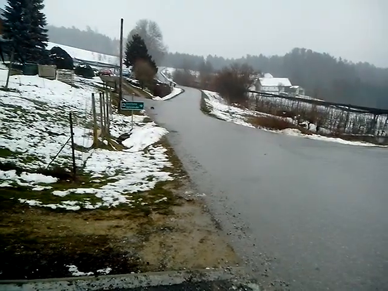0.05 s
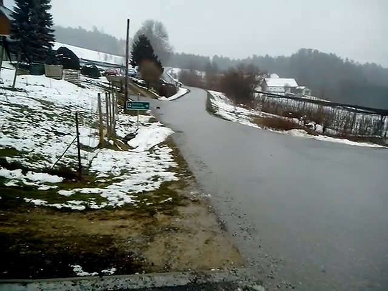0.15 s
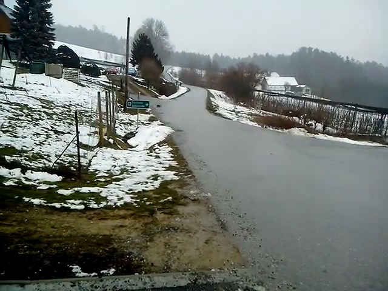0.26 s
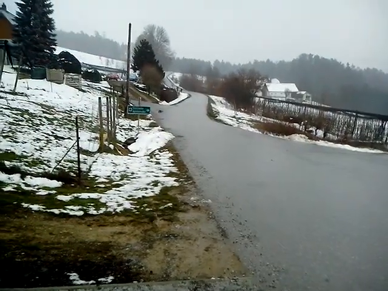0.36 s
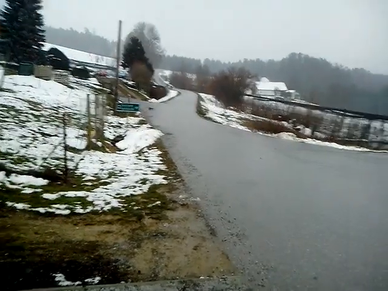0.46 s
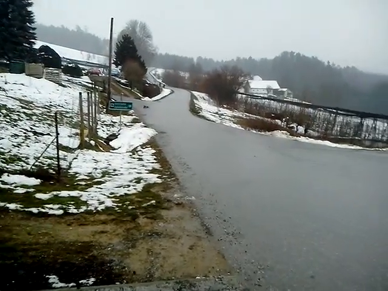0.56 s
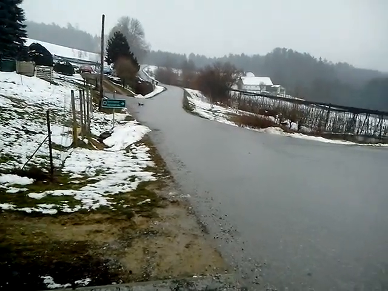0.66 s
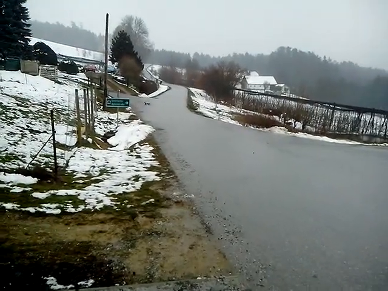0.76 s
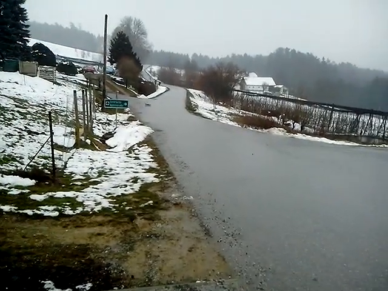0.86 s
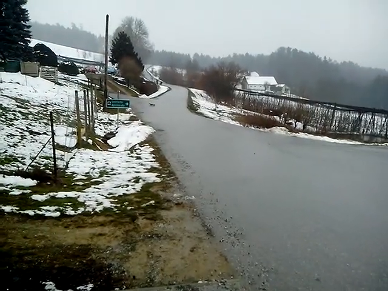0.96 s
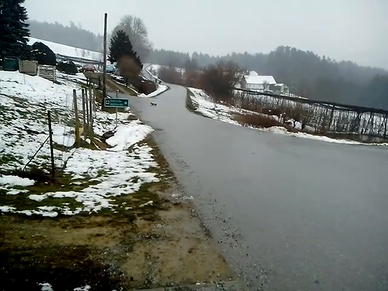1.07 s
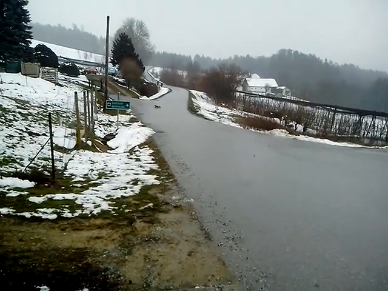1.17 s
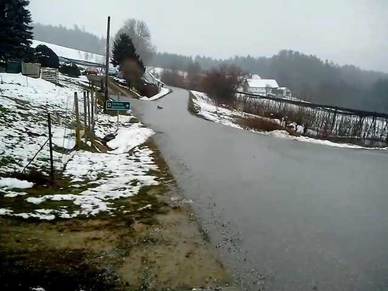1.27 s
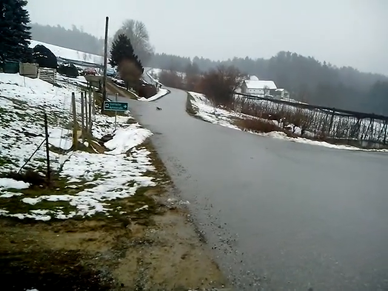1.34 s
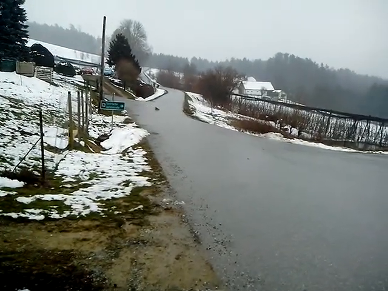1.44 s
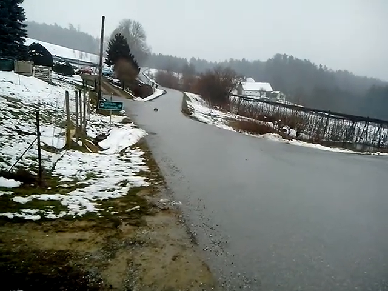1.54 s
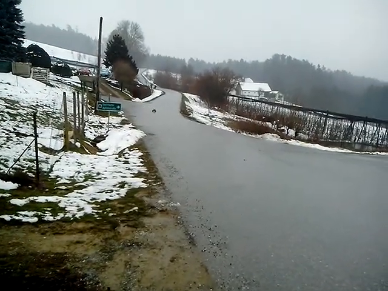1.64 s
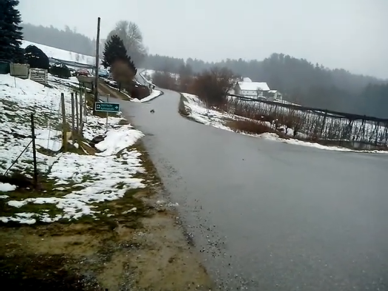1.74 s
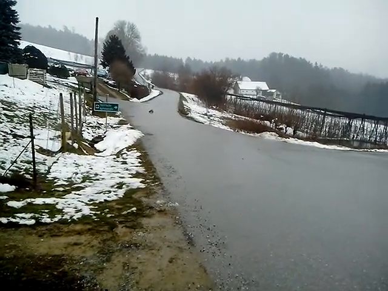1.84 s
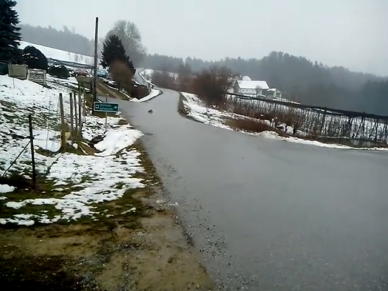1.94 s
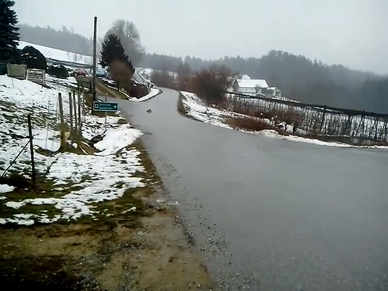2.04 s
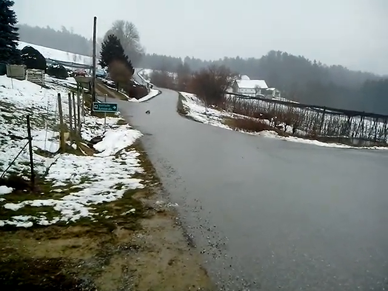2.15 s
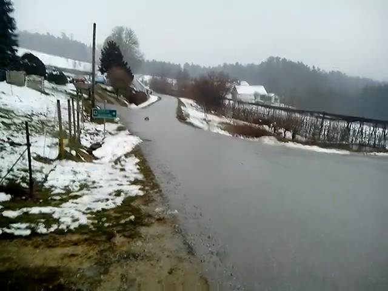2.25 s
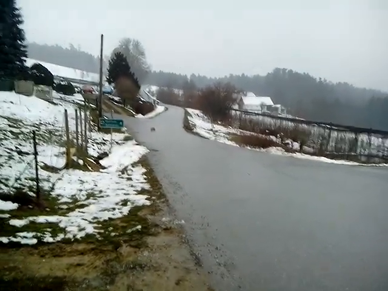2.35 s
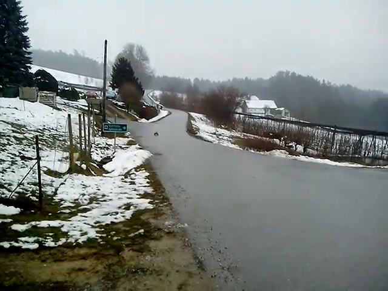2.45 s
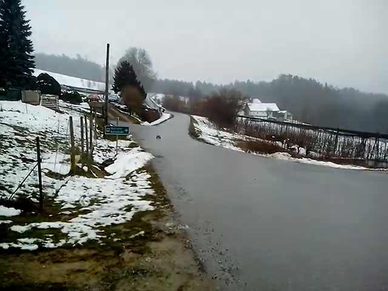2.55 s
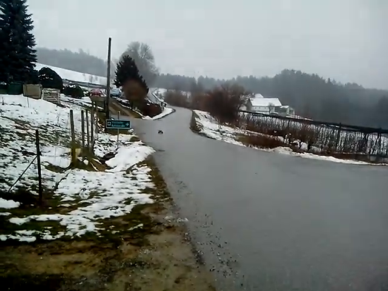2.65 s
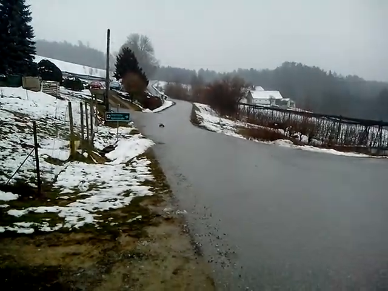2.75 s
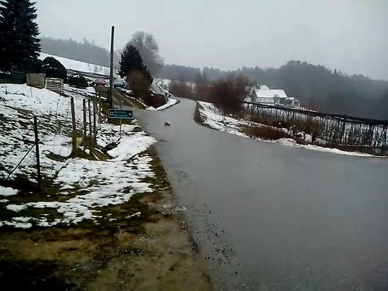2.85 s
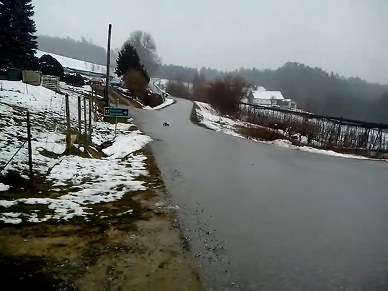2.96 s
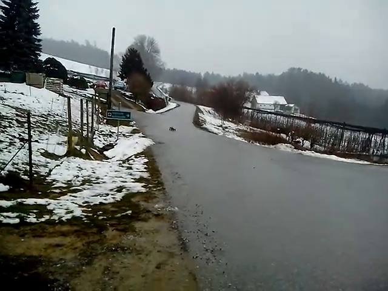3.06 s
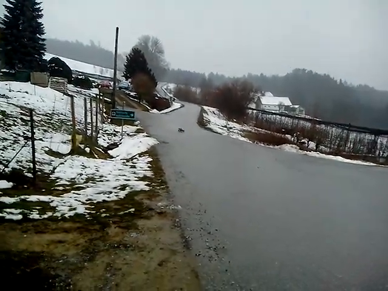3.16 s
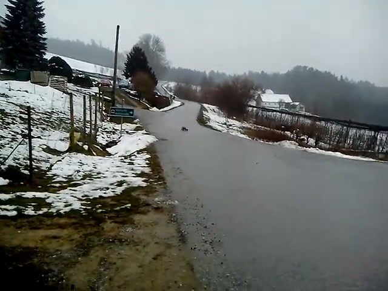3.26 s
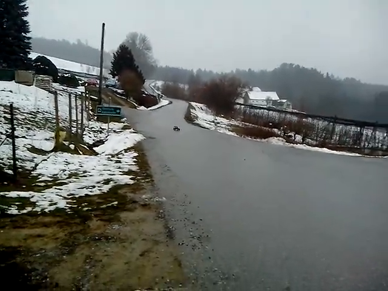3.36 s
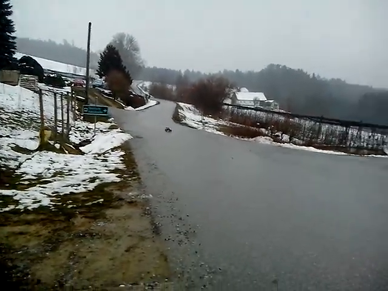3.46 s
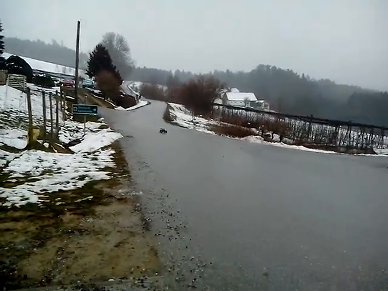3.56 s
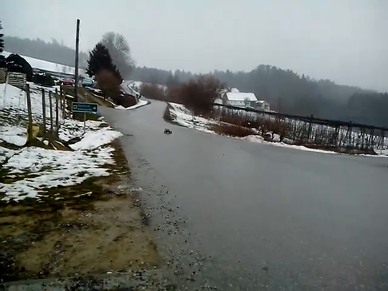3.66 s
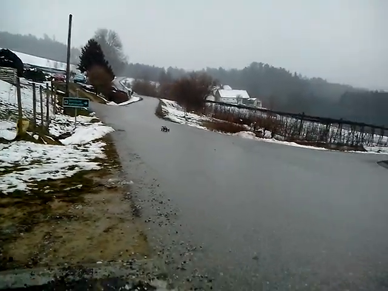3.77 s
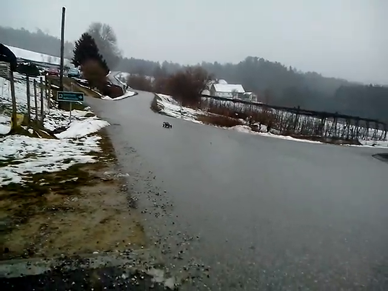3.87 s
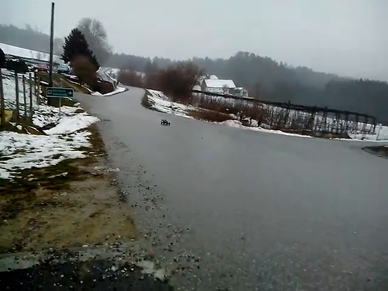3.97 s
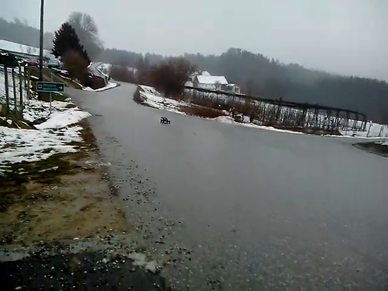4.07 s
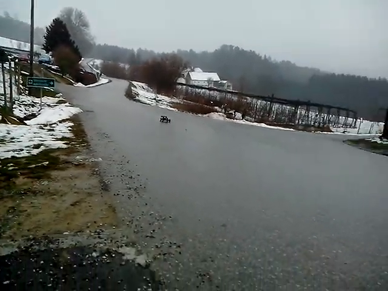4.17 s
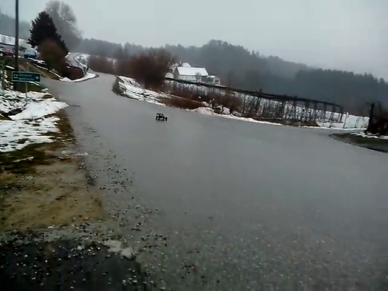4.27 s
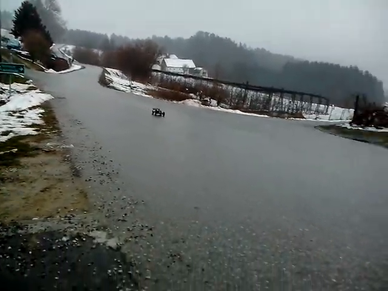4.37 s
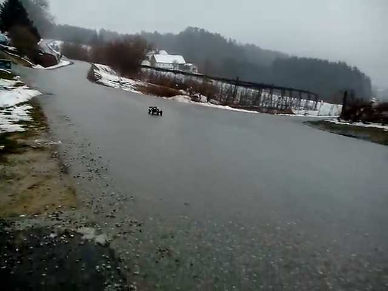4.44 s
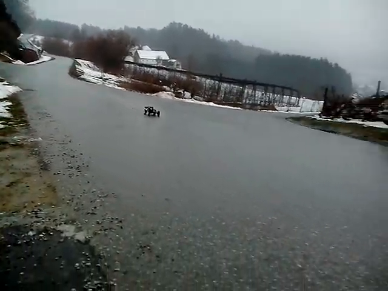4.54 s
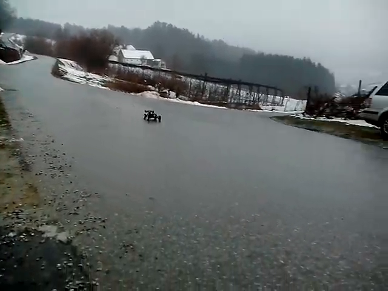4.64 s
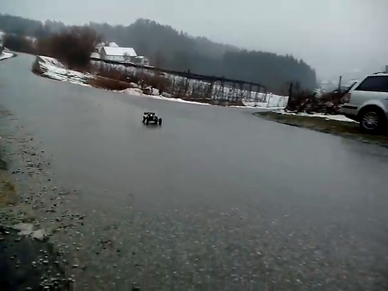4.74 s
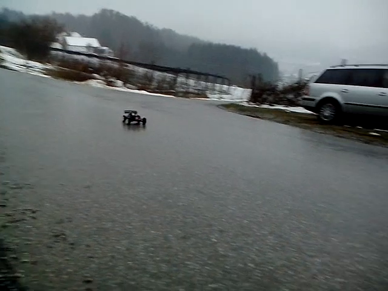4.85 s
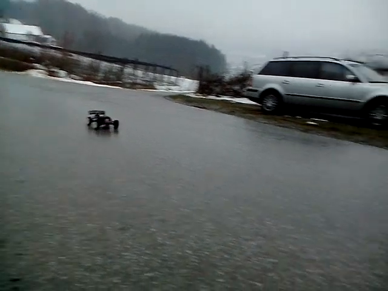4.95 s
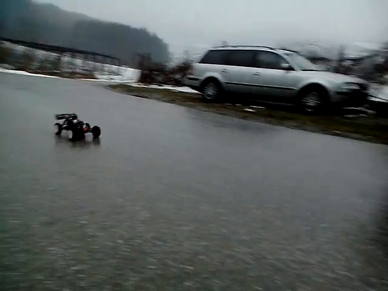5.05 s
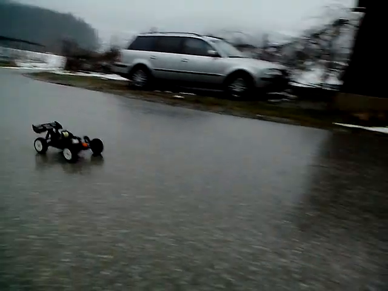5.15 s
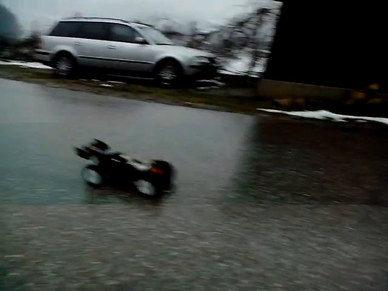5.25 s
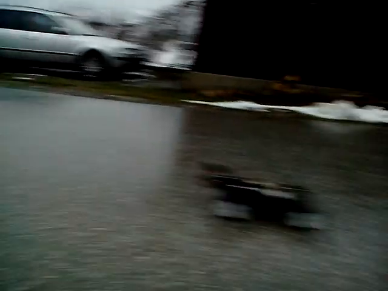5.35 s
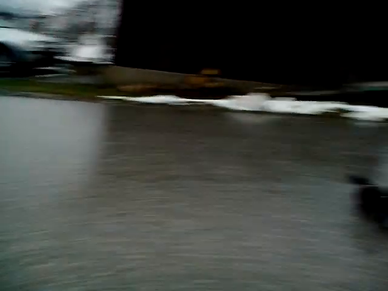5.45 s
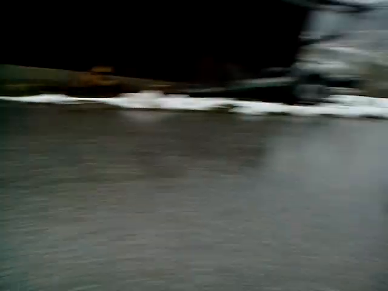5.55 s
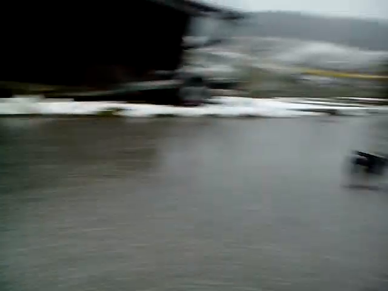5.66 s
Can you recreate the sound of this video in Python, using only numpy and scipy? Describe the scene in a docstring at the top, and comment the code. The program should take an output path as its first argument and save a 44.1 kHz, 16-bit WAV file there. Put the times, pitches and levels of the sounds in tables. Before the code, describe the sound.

Outdoors on a wet country road, a small fuel-powered model buggy buzzes faintly far off, falls to a rattling idle, then opens up. Its raspy whine climbs unevenly in pitch and loudness, stuttering, until it screams past the microphone with wet tyre hiss and quickly drops away. Thin, slightly harsh small-microphone sound.

```python
"""A nitro model buggy, far down a wet country road, drops to idle, then opens up and races past.
Its tiny two-stroke fires once a turn: near-pure low exhaust orders, and trains of pulses and gas noise
that excite the resonances of a rasping pipe and silencer, a hoarse intake and a shrill metal casing.
Wet tyres hiss as filtered noise, strongest close by; delayed copies give faint roadside echoes.
Behind lie a soft hiss, a faint 100 Hz tone that lossy coding cuts in and out, and one dull bump."""
import sys
import numpy as np
from scipy import signal
from scipy.fft import rfft, irfft, next_fast_len
from scipy.io import wavfile
from scipy.ndimage import uniform_filter1d, map_coordinates

SR = 44100
rng = np.random.default_rng(int(sys.argv[2]) if len(sys.argv) > 2 else 0)


def wav_record(signal):
    """Record a signal, one row per channel, as 16-bit PCM in the file named by sys.argv[1]."""
    frames = np.transpose(np.atleast_2d(signal))
    bounded = np.clip(frames, -1, 1)
    # unit amplitude maps onto the largest positive 16-bit level
    quanta = np.round(bounded * 32767).astype(np.int16)
    wavfile.write(sys.argv[1], SR, quanta)


N = 251811
TIME = np.arange(N) / SR
# nearest moment (s), nearest distance (m), road speed (m/s)
PASS_S, PASS_M, ROAD_M_PER_S = 5.54, 2.27, 5.1
# the rocking buggy: spread of its level and of each resonance (dB), random steps per s
ROCK_DB, MODE_FADE_DB, ROCKS_PER_S = 1.0, 5.5, 8.0


def from_db(db):
    """Logarithmic level: decibels become an amplitude gain."""
    return 10 ** (np.asarray(db) / 20)


def in_time(rows):
    """Linear interpolation: one curve over time for each column after the time."""
    seconds, *columns = np.transpose(rows)
    return [np.interp(TIME, seconds, column) for column in columns]


def track(rows):
    """Linear interpolation of a table with a single column after the time."""
    return in_time(rows)[0]


def levelled(x, size=3001):
    """Normalisation: divide by the running rms so that the level stays near 1."""
    return x / np.sqrt(np.abs(uniform_filter1d(x * x, size)) + 1e-12)


def band(x, low_hz, high_hz, order=2):
    """Band limitation: a Butterworth filter passes only the stated range."""
    return signal.sosfilt(signal.butter(order, [low_hz, high_hz], "band", fs=SR, output="sos"), x)


def drift(rate):
    """Random modulation: a smooth curve through normal chance values, rate of them per second."""
    knots = rng.standard_normal(8000)
    return map_coordinates(knots, [TIME * rate], order=2, mode="wrap")


def noise(spectrum):
    """Spectral shaping: white noise weighted by frequency, then scaled to rms 1."""
    hz, db = np.transpose(spectrum)
    size = next_fast_len(N, True)
    log_hz = np.log(np.fft.rfftfreq(size, 1 / SR) + 1)
    gain = from_db(np.interp(log_hz, np.log(hz), db))
    x = irfft(rfft(rng.standard_normal(size)) * gain, size)[:N]
    return x / x.std()


def resonate(x, hz, width):
    """Resonance of about unit gain: shift to zero frequency, low-pass, shift back; the centre may move."""
    carrier = np.exp(2j * np.pi * np.cumsum(hz + np.zeros(N)) / SR)
    r = np.exp(-np.pi * width / SR)
    return 2 * np.real(carrier * signal.lfilter([1 - r], [1, -r], x / carrier))


def body(x, modes):
    """Modal superposition: resonances of alternating sign, each fading as the buggy turns and bounces."""
    total = np.zeros(N)
    for k, (hz, width, db) in enumerate(modes):
        gain = from_db(db + MODE_FADE_DB * drift(ROCKS_PER_S))
        total += (-1) ** k * gain * resonate(x, hz, width)
    return total


# Crank speed at part throttle, idle, a cruise, a stumbling climb, then flat out.
# Each row: time in seconds, speed in firings per second before hunting and stumbles.
CRANK_SPEED = [(0, 219), (.11, 224), (.15, 215), (.25, 222), (.41, 216), (.62, 120), (.8, 118), (.89, 205),
               (1.04, 208), (1.16, 247), (1.35, 238), (1.41, 250), (1.49, 238), (1.7, 238), (2.2, 247),
               (2.52, 249), (2.636, 262), (2.664, 278), (2.695, 305), (2.725, 305), (2.745, 295),
               (2.772, 298), (2.8, 277), (2.824, 277), (2.864, 298), (2.89, 293), (2.92, 298), (2.968, 293),
               (2.99, 285), (3.022, 296), (3.076, 300), (3.148, 297), (3.168, 315), (3.195, 306),
               (3.262, 317), (3.316, 311), (3.34, 315), (3.408, 308), (3.508, 330.5), (3.6, 338),
               (3.65, 345), (3.9, 361), (4.11, 375), (4.29, 385), (4.38, 383), (4.46, 395), (4.65, 399.5),
               (4.76, 399), (4.86, 412.5), (5.47, 423.5), (5.71, 410)]
# Main pipe resonance, which rises as the exhaust gas heats under load.
# Each row: time in seconds, frequency in Hz.
PIPE_TUNING = [(0, 1305), (.3, 1340), (.7, 1430), (1.03, 1408), (1.2, 1520), (1.4, 1660), (1.62, 1347),
               (2.2, 1564), (2.6, 1560), (3.0, 1530), (3.4, 1750), (3.6, 1670), (4.398, 1714), (4.9, 1810)]
# Pipe modes. Each row: multiple of the main resonance, width in Hz, relative level in dB.
PIPE_MODES = [(0.779, 201, -4), (1, 194, 5), (1.18, 216, 0)]
# Lower silencer modes. Each row: frequency in Hz, width in Hz, relative level in dB.
RASP_MODES = [(2306, 180, 1), (2608, 130, -4.5), (2888, 110, -3)]
# Upper silencer modes. Each row: frequency in Hz, width in Hz, relative level in dB.
HIGH_RASP_MODES = [(3144, 72, 3), (3428, 55, 1.5), (3596, 110, -8)]
# Main intake resonance. Each row: time in seconds, frequency in Hz.
INTAKE_TUNING = [(0, 4490), (.9, 4930), (1.02, 4650), (1.131, 4680), (1.45, 4620), (1.88, 4820),
                 (2.1, 4900), (2.929, 4870), (3.459, 4460), (4.07, 4670), (4.35, 5340), (5.1, 5120),
                 (5.5, 5270)]
# Intake modes. Each row: multiple of the main resonance, width in Hz, relative level in dB.
INTAKE_MODES = [(.92, 129.4, -1.5), (1.001, 130.5, -1.5), (1.059, 130, -1.5)]
# Casing modes. Each row: multiple of the casing ring, width in Hz, relative level in dB.
CASING_MODES = [(0.953, 130, 0), (0.999, 121.6, 3.5), (1.052, 130, -2.5)]
# Level of the pipe's bark in the midrange. Each row: time in seconds, level in dB before BARK_DB.
BARK_LEVEL = [(0.03, -38.5), (0.3, -47), (0.5, -64), (0.65, -69), (0.82, -52), (0.86, -39), (1.04, -36),
              (1.22, -33.5), (1.42, -36.5), (1.55, -44), (1.63, -35.5), (2.24, -33), (3.62, -37),
              (3.97, -30), (4.87, -36), (5.17, -30), (5.44, -34.5), (5.5, -29), (5.55, -45), (5.63, -51),
              (5.71, -59)]
# Level of the silencer's lower rasp. Each row: time in seconds, level in dB before RASP_DB.
RASP_LEVEL = [(0, -44), (.24, -44.5), (.45, -50.5), (.55, -79), (.8, -74), (.9, -48), (1.02, -46.5),
              (1.33, -38.5), (1.46, -54), (1.61, -42), (1.76, -63), (1.94, -37), (2.43, -42), (2.72, -39),
              (3.32, -40.5), (3.53, -37), (3.85, -37), (4.01, -30), (4.23, -40), (4.61, -32), (4.91, -40.5),
              (5.35, -27.5), (5.48, -31), (5.59, -33), (5.63, -48), (5.71, -47)]
# Level of the silencer's upper rasp. Each row: time in seconds, level in dB.
HIGH_RASP_LEVEL = [(0, -42), (.4, -51.5), (.55, -66), (.8, -61), (.9, -42), (1.02, -54), (1.14, -32),
                   (1.19, -39), (1.48, -31.5), (1.53, -43), (1.65, -34), (1.8, -44), (2.22, -38),
                   (2.67, -48.5), (3.02, -30.5), (3.08, -37), (3.65, -43.5), (4.04, -33), (4.34, -53),
                   (4.44, -38.5), (4.8, -42.5), (5.34, -29), (5.41, -34), (5.6, -27.5), (5.64, -46),
                   (5.71, -42)]
# Level of the intake rasp. Each row: time in seconds, level in dB.
INTAKE_RASP_LEVEL = [(0, -39.5), (.35, -51), (.55, -72), (.8, -66), (.87, -46), (.98, -50), (1.02, -37.5),
                     (1.08, -33.5), (1.13, -27.5), (1.18, -33), (1.25, -29), (1.42, -32.5), (1.77, -44),
                     (1.88, -32.5), (2.63, -46), (2.719, -38), (2.89, -41.5), (2.93, -31), (2.98, -37.5),
                     (3.43, -31), (3.46, -25.5), (3.65, -41), (4.069, -34.5), (4.28, -35), (4.351, -23.5),
                     (4.63, -32), (5.11, -33), (5.47, -20), (5.6, -20), (5.64, -37), (5.71, -34)]
# Level of the casing ring in the treble. Each row: time in seconds, level in dB before RING_DB.
RING_LEVEL = [(0.0, -35.5), (0.16, -47), (0.38, -37.5), (0.56, -62), (1.06, -43), (1.1, -29.5),
              (1.16, -39.5), (1.21, -27.5), (1.37, -35.5), (1.4, -26.5), (1.53, -34), (1.58, -25),
              (1.65, -22), (1.84, -28), (2.11, -22.5), (3.08, -22.5), (3.1, -26), (3.39, -17.5),
              (3.62, -19.5), (3.69, -26.5), (3.72, -19.5), (3.91, -18.5), (3.99, -13), (4.04, -17.5),
              (4.6, -18.5), (4.64, -13), (4.69, -20), (4.8, -15), (5.4, -17.5), (5.53, -10.5),
              (5.65, -11.5), (5.71, -18)]
# Level of the casing's highest mode. Each row: time in seconds, level in dB before SHRILL_DB.
SHRILL_RING_LEVEL = [(0.0, -45.5), (0.7, -62), (1.06, -61), (1.13, -32.5), (1.84, -61), (2.81, -33),
                     (3.01, -44), (3.23, -22), (3.48, -18), (3.9, -28.5), (3.94, -21.5), (4.8, -28.5),
                     (5.2, -25), (5.261, -33), (5.36, -14), (5.411, -24.5), (5.6, -11.5), (5.65, -22),
                     (5.71, -19)]
SHRILL_HZ, SHRILL_WIDTH_HZ = 6974, 300
BARK_DB, RASP_DB, RING_DB, SHRILL_DB = 3.5, 1, 1.5, -2
# a stumble costs speed and level: share of speed, and dB, per unit of the share lost
STUMBLE_SAG, STUMBLE_DB = .13, -12
# the revs hunt in small quick steps and the note swells with them: share of speed, dB, steps per s
HUNT_SHARE, HUNT_DB, HUNTS_PER_S = .004, 1.2, 55


def engine():
    """Source and filter: one crank drives the low orders and excites every resonance."""
    rate = track(CRANK_SPEED)
    pipe_hz, intake_hz = track(PIPE_TUNING), track(INTAKE_TUNING)
    uneven, skip, ring_hz = running_state(rate)
    stumble, hunt = stumbles(), drift(HUNTS_PER_S)
    skip = skip + stumble
    steady, turns = crank(rate * (1 - STUMBLE_SAG * stumble + HUNT_SHARE * hunt), uneven)

    # excitations at the exhaust, the intake and the casing
    pops = firings(turns, uneven, skip, spread_db=1.5, jitter_s=.00007, gas=.55, gas_decay=0.25)
    gulps = firings(turns, uneven, skip, spread_db=1.5, jitter_s=.00006, gas=0.81, gas_decay=0.16)
    knocks = firings(turns, uneven, skip, spread_db=-1.0, jitter_s=0.000089, gas=1.61, gas_decay=1.0)

    bark = body(pops, [(ratio * pipe_hz, width, db) for ratio, width, db in PIPE_MODES])
    pipe = from_db(track(BARK_LEVEL) + BARK_DB) * levelled(band(bark, 715, 3320, order=4))

    low_rasp = ground_bounce(body(pops, RASP_MODES))
    rasp = from_db(track(RASP_LEVEL) + RASP_DB) * levelled(band(low_rasp, 2084, 3157, order=4))
    high_rasp = body(pops, HIGH_RASP_MODES)
    rasp_high = from_db(track(HIGH_RASP_LEVEL)) * levelled(band(high_rasp, 3140, 3850, order=4))

    suck = body(gulps, [(ratio * intake_hz, width, db) for ratio, width, db in INTAKE_MODES])
    suck = ground_bounce(suck, path_s=0.001493)
    intake = from_db(track(INTAKE_RASP_LEVEL)) * levelled(band(suck, 3240, 5900, order=4))

    metal = body(knocks, [(ratio * ring_hz, width, db) for ratio, width, db in CASING_MODES])
    ring = from_db(track(RING_LEVEL) + RING_DB) * levelled(band(metal, 5010, 6670, order=4))
    top_mode = band(resonate(knocks, SHRILL_HZ, SHRILL_WIDTH_HZ), 6750, 7280, order=3)
    shrill = from_db(track(SHRILL_RING_LEVEL) + SHRILL_DB) * levelled(top_mode)

    orders_db = order_levels(rate) + STUMBLE_DB * stumble + HUNT_DB * hunt
    note = exhaust_note(steady, orders_db, uneven, skip)
    return note + pipe + can_ring(pops) + rasp + rasp_high + intake + ring + shrill


def crank(rate, uneven, tremble_base=0.0022, tremble_rough=0.0063):
    """Phase as integrated speed: the flywheel's steady turns, and trembling turns that blur high orders."""
    tremble = (tremble_base + tremble_rough * uneven) * drift(140)
    stray = np.cumsum(rate * tremble) / SR
    steady = np.cumsum(rate) / SR
    # removing the slow part of the stray keeps both counts together
    return steady, steady + stray - uniform_filter1d(stray, size=4001)


# How the engine runs at each speed. Each row: speed in firings per second, unevenness from 0 to 1,
# share lost on every second firing before stumbles, casing ring in Hz.
RUNNING_BY_REVS = [(120, 1, 0.045, 6500), (236.5, 0.97, 0.018, 6000), (252.6, 0.67, 0.014, 6165),
                   (297.6, 0.98, .02, 6060), (322.5, 0.75, 0.015, 6390), (334, 0.73, 0.021, 6250),
                   (391.7, 0.57, 0.0065, 6340), (414.5, 0.38, 0.0043, 6600), (423, 0.34, 0.0068, 6590)]
# after the pass the throttle eases and the engine soon runs smoothly: time constant (s)
SMOOTH_S = .07


def running_state(rate):
    """Speed dependence: roughness, skipping and casing ring follow the revs; roughness decays past the pass."""
    revs, *columns = np.transpose(RUNNING_BY_REVS)
    uneven, skip, ring_hz = (np.interp(rate, revs, column) for column in columns)
    return uneven * np.exp(-np.maximum(TIME - PASS_S, 0) / SMOOTH_S), skip, ring_hz


# Stumbles on the climb, firing strong and weak in turn.
# Each row: centre in seconds, length in seconds, share lost on every second firing.
STUMBLE_TIMES = [(3.682, .06, .08), (3.785, .03, .08), (3.911, .03, .08), (3.954, .03, .07),
                 (4.038, .03, .06), (4.139, .05, .1), (4.224, .04, .1), (4.33, .06, .16), (4.396, .04, .14),
                 (4.576, .05, .13), (4.699, .04, .13), (4.757, .04, .1)]


def stumbles():
    """Subharmonic modulation: the share lost on every second firing swells and fades as a Gaussian."""
    return sum(share * np.exp(-(2 * (TIME - s) / length) ** 2) for s, length, share in STUMBLE_TIMES)


def firings(turns, uneven, skip, spread_db, jitter_s, gas, gas_decay):
    """Impulsive excitation: each firing is a pressure click and a puff of turbulent gas, decaying in turns."""
    cycle = turns.astype(int)
    chance = rng.standard_normal((2500, 2))
    # lopsided chance: a positive spread leans to weak firings, a negative one to strong
    burn_db = spread_db * uneven * np.clip(chance[cycle, 0], -3, 1.5)
    strength = from_db(burn_db) * (1 - skip * (cycle % 2))
    at = np.flatnonzero(np.diff(cycle)) + 1
    late = jitter_s * SR * uneven[at] ** 2 * chance[cycle[at], 1]
    exact = np.clip(np.interp(cycle[at], turns, np.arange(N)) + late, 0, N - 2)
    # each click is shared between the two nearest samples
    whole, clicks = exact.astype(int), np.zeros(N)
    clicks[whole] += strength[at] * (1 - exact % 1)
    clicks[whole + 1] += strength[at] * (exact % 1)
    puff = strength * np.exp(-(turns % 1) / gas_decay) * rng.standard_normal(N)
    return levelled(clicks) + gas * uneven * levelled(puff)


def exhaust_note(turns, orders_db, uneven, skip, flutter=0.27, smear=0.24, burble_db=-0.5):
    """Harmonic synthesis: near-pure low orders; alternate firings add half orders and a low burble."""
    shake, slip = np.tanh(drift(260)), np.tanh(drift(200))
    phase = 2 * np.pi * turns + smear * uneven * slip
    orders = np.zeros(N)
    for k, db in enumerate(orders_db, 1):
        orders += np.sqrt(2) * from_db(db) * (1 + flutter * uneven * shake) * np.cos(k * phase)
    burble = from_db(orders_db[0] + burble_db)
    return orders + skip * np.cos(np.pi * turns) * (2 * orders + burble)


# What the exhaust passes below the revs where the pipe takes hold.
# Each row: frequency in Hz, relative response in dB.
RESPONSE_OFF_PIPE = [(120, 3), (206, 7), (240, -4), (415, 5), (490, 2.5), (620, 2.5), (720, 11.5), (850, 0),
                     (970, 8)]
# What the exhaust passes once the pipe has taken hold. Each row: frequency in Hz, relative response in dB.
RESPONSE_ON_PIPE = [(310, -11.5), (350, -10.5), (415, -9), (610, -1), (760, 3.5), (840, 5.5), (890, 0),
                    (1100, 5), (1270, 6.5), (1350, 1), (1400, -6.5), (1470, -4.5), (1620, -10)]
# Level of the exhaust note at the roadside.
# Each row: time in seconds, level in dB before the speed and overall changes.
NOTE_LEVEL = [(0, -45.5), (.4, -50.5), (.7, -65), (.92, -49.5), (1.1, -40), (1.42, -42.5), (1.62, -36),
              (2.1, -40.5), (2.63, -40), (2.7, -26.5), (2.85, -28), (3.4, -24), (4.05, -19), (4.33, -21),
              (4.45, -19), (4.6, -21), (4.9, -23), (5.1, -21), (5.35, -17), (5.52, -19), (5.71, -39)]
# Level change by speed: the note loses its clean orders near idle.
# Each row: speed in firings per second, change in dB.
IDLE_CHANGE = [(120, -4), (195, 1.5)]
# the pipe takes hold between these speeds (firings per s); overall level of the note (dB)
ON_PIPE_FROM, ON_PIPE_FULL, NOTE_DB = 258, 280, 0.5


def order_levels(rate, count=4, fade_db=2.0):
    """Resonant response: low orders slide through it and share the note's level, each fading a little."""
    on_pipe = np.interp(rate, [ON_PIPE_FROM, ON_PIPE_FULL], [0, 1])
    orders_db = []
    for k in range(1, count + 1):
        off_db = np.interp(k * rate, *np.transpose(RESPONSE_OFF_PIPE))
        on_db = np.interp(k * rate, *np.transpose(RESPONSE_ON_PIPE))
        orders_db.append((1 - on_pipe) * off_db + on_pipe * on_db + fade_db * drift(8.7))
    orders_db = np.array(orders_db)
    total_db = 10 * np.log10(np.sum(from_db(orders_db) ** 2, axis=0))
    idle_db = np.interp(rate, *np.transpose(IDLE_CHANGE))
    return orders_db - total_db + track(NOTE_LEVEL) + NOTE_DB + idle_db


# Level of the silencer can's two rings.
# Each row: time in seconds, low ring in dB, high ring in dB.
CAN_RING_LEVEL = [(0, -46, -58), (.3, -38.5, -47), (.48, -49.5, -50), (.65, -51.5, -59), (.8, -48, -62),
                  (.88, -30.5, -48), (1.04, -32.5, -41.5), (1.17, -47, -33), (1.5, -48, -46),
                  (1.8, -42.5, -43.5), (2.299, -37.5, -63), (2.8, -52.5, -47.5), (4.4, -51, -46.5),
                  (4.9, -63, -42), (5.5, -62, -29.5), (5.71, -64, -31.5)]
# low and high ring: (Hz, width Hz)
CAN_LOW, CAN_HIGH = (1450, 65), (2040, 55)


def can_ring(pops):
    """Forced resonance: the firings set the silencer can ringing at two pitches."""
    total = np.zeros(N)
    for (hz, width), db in zip((CAN_LOW, CAN_HIGH), in_time(CAN_RING_LEVEL)):
        total += from_db(db) * levelled(band(resonate(pops, hz, width), hz - 220, hz + 220))
    return total


def ground_bounce(x, path_s=0.000669, wander_s=.00003, reflected=.99):
    """Comb interference: a second path off the wet road cuts slowly wandering notches."""
    return x + reflected * np.interp(TIME - path_s - wander_s * drift(1.9), TIME, x, left=0)


# Loose metal chinks while the engine idles. Each row: start in seconds, level in dB.
CHINK_TIMES = [(0.622, -40), (0.673, -32), (0.7, -41), (.707, -29), (0.732, -34), (0.751, -29),
               (0.753, -38)]
# What each chink rings with. Each row: frequency in Hz, decay in seconds, relative level in dB.
CHINK_RINGS = [(1510, 0.0036, -7.5), (5800, .003, -5.5), (5730, .002, -13), (6250, .0015, -10)]


def chinks():
    """Free vibration: short metal knocks from the shaking buggy, each a sum of decaying sines."""
    out = np.zeros(N)
    age = np.arange(2000) / SR
    ring = np.zeros(len(age))
    for hz, decay, db in CHINK_RINGS:
        ring += from_db(db) * np.exp(-age / decay) * np.sin(2 * np.pi * hz * age)
    for start, db in CHINK_TIMES:
        out[int(start * SR):][:len(ring)] += from_db(db) * ring
    return out


# Spectrum of the tyre hiss. Each row: frequency in Hz, relative density in dB per Hz.
TYRE_SPECTRUM = [(100, -47), (250, -61.5), (400, -20.5), (900, -23), (1500, -19), (2400, -19.5),
                 (3900, -19), (4800, -12), (5600, -4), (7000, -6.5), (8000, -45.5)]
# mean level at the nearest point and top revs (dB), rise with the revs (dB per doubling)
TYRE_DB, TYRE_DB_PER_OCTAVE = -19, 5.5
# once past, the buggy leaves the front of the microphone and the hiss dies away (dB per s)
BEHIND_DB_PER_S = 97


def tyres(splash_db=2.5):
    """Spherical spreading: bursts of spray hiss fall off with distance and grow with the revs."""
    rate = track(CRANK_SPEED)
    distance = np.hypot(PASS_M, ROAD_M_PER_S * (TIME - PASS_S))
    revs_db = TYRE_DB_PER_OCTAVE * np.log2(rate / rate.max())
    behind_db = BEHIND_DB_PER_S * np.maximum(TIME - PASS_S, 0)
    hiss_db = TYRE_DB + revs_db - behind_db + splash_db * drift(150)
    return from_db(hiss_db) * PASS_M / distance * noise(TYRE_SPECTRUM)


# Echoes from roadside objects. Each row: mean delay in seconds, level in dB before echo_db.
ROADSIDE_ECHOES = [(.0047, -14), (.0113, -16), (.029, -21), (.053, -24), (.094, -26), (.161, -28)]


def roadside(x, sway_s=0.00044, echo_db=-2):
    """Discrete reflection: delayed copies whose paths slowly change length as the buggy moves."""
    total = x.copy()
    for delay, db in ROADSIDE_ECHOES:
        total += from_db(db + echo_db) * np.interp(TIME - delay - sway_s * drift(3), TIME, x, left=0)
    return total


# Spectrum of the background hiss. Each row: frequency in Hz, relative density in dB per Hz.
HISS_SPECTRUM = [(40, -53), (80, -31), (130, -4.5), (600, -3), (1300, 1), (1750, -4), (2500, -13),
                 (3300, -2.5), (4000, -9), (6000, -9), (8000, -17.5)]
# Level of the background hiss, thinned by lossy coding as the engine grows loud.
# Each row: time in seconds, rms level in dB.
HISS_LEVEL = [(0, -44), (1.0, -52.5), (1.6, -54), (5.71, -65.5)]
# Level of the faint tone as coding lets it through. Each row: time in seconds, rms level in dB.
TONE_LEVEL = [(0, -65), (1.25, -72.5), (1.6, -98), (1.78, -45), (2.15, -60.5), (2.3, -89), (2.85, -55.5),
              (3.15, -51), (3.25, -99), (3.55, -80), (3.65, -49), (3.95, -56), (4.4, -74), (4.6, -110)]
TONE_HZ = 100
# handling bump: start (s), pitch (Hz), starting level (dB), decay (s)
BUMP_S, BUMP_HZ, BUMP_DB, BUMP_DECAY_S = .018, 215, -30, .015


def background():
    """Fading noise, a gated pure tone and a damped sine: soft hiss, a faint tone and a dull handling bump."""
    age = np.maximum(TIME - BUMP_S, 0)
    bump = from_db(BUMP_DB) * np.exp(-age / BUMP_DECAY_S) * np.sin(2 * np.pi * BUMP_HZ * age)
    tone = from_db(track(TONE_LEVEL)) * np.sqrt(2) * np.sin(2 * np.pi * TONE_HZ * TIME)
    return from_db(track(HISS_LEVEL)) * noise(HISS_SPECTRUM) + tone + bump


def scene():
    """Superposition: the rocking buggy with its echoes, the tyres and the background, in mono."""
    buggy = from_db(ROCK_DB * drift(ROCKS_PER_S)) * engine() + chinks()
    return (roadside(buggy) + tyres() + background())[None]


# the small microphone's bass roll-off, and the treble limits before and after the mirror image (Hz)
LOW_CUT_HZ, TOP_HZ, CUTOFF_HZ = 88, 7500, 9300
# coarse sampling folds a faint mirror image of the treble upward: sampling rate (Hz), image level (dB)
COARSE_HZ, MIRROR_DB = 16000, -41


def record(dry):
    """Band limits, saturation and aliasing: thin bass, squeezed peaks and a faint mirrored treble."""
    thin = signal.sosfilt(signal.butter(3, LOW_CUT_HZ, "high", fs=SR, output="sos"), dry)
    envelope = np.abs(signal.hilbert(thin))
    rounded = thin / (1 + envelope ** 10) ** (1 / 10)  # only the loudest peaks are squeezed
    dull = signal.sosfiltfilt(signal.ellip(8, .1, 45, TOP_HZ, fs=SR, output="sos"), rounded)
    mirrored = dull * (1 + 2 * from_db(MIRROR_DB) * np.cos(2 * np.pi * COARSE_HZ * TIME))
    return signal.sosfiltfilt(signal.ellip(8, .1, 45, CUTOFF_HZ, fs=SR, output="sos"), mirrored)


dry = scene()
out = record(dry)
wav_record(out)
```